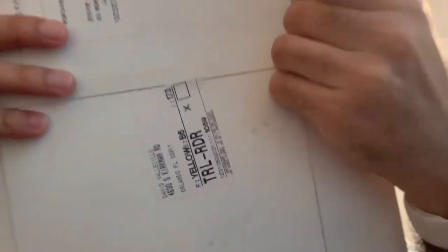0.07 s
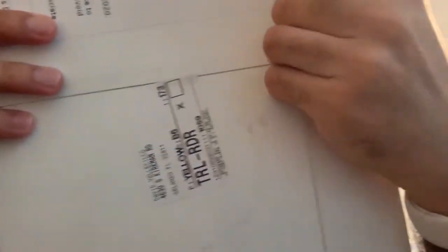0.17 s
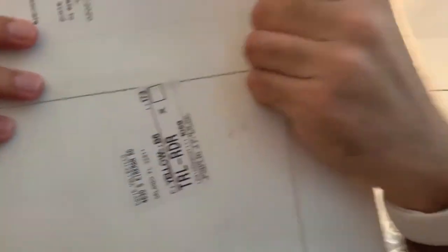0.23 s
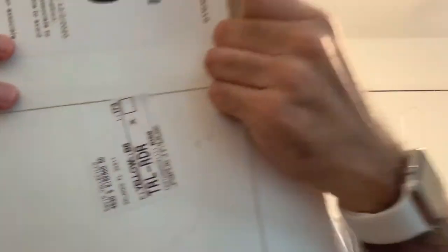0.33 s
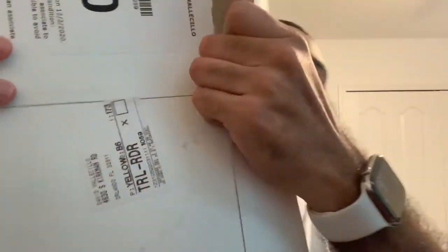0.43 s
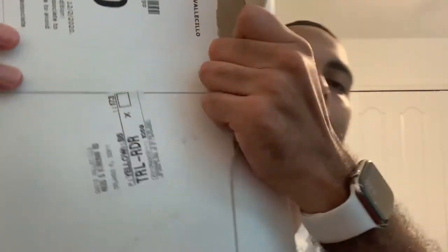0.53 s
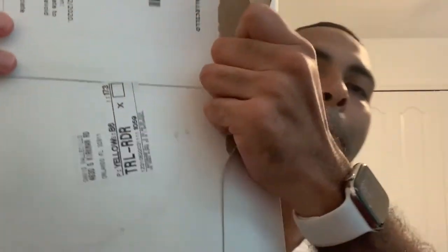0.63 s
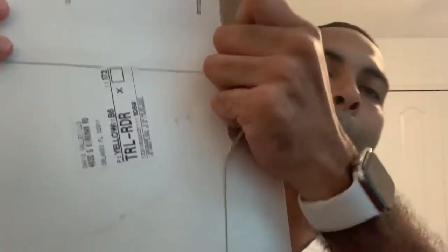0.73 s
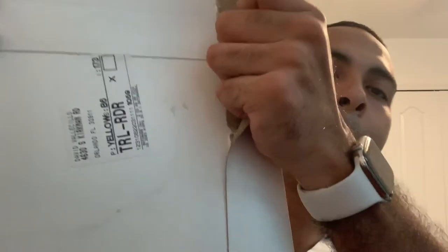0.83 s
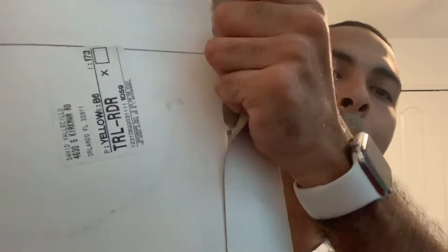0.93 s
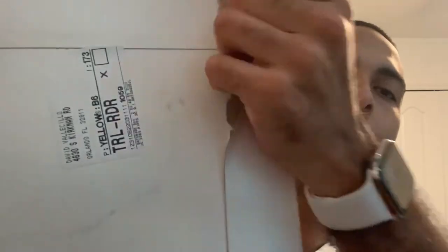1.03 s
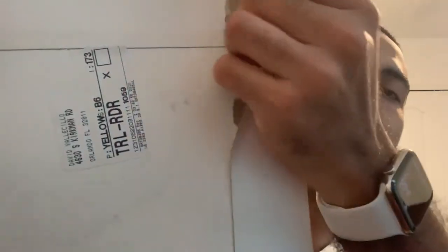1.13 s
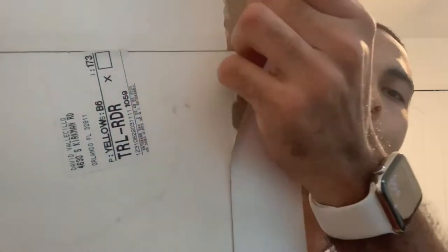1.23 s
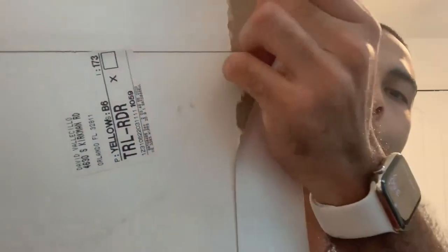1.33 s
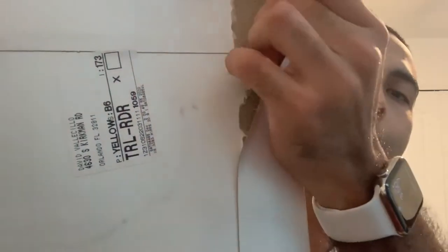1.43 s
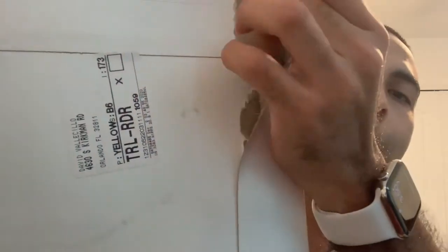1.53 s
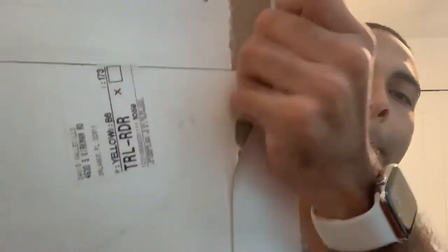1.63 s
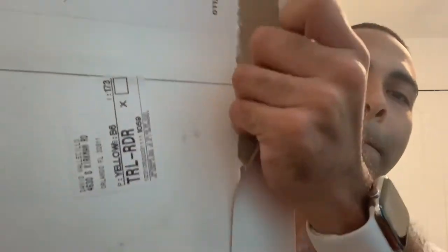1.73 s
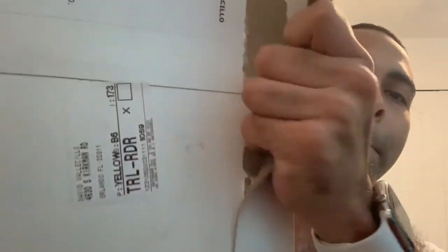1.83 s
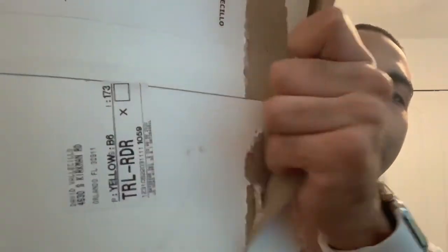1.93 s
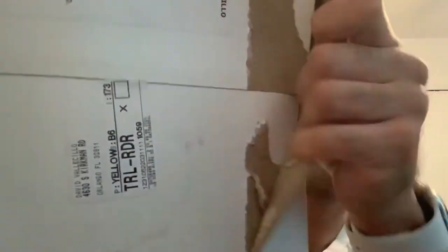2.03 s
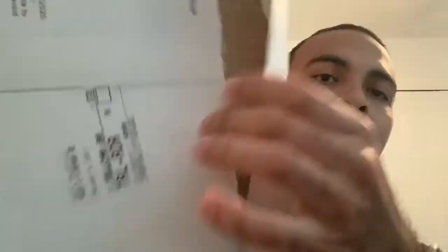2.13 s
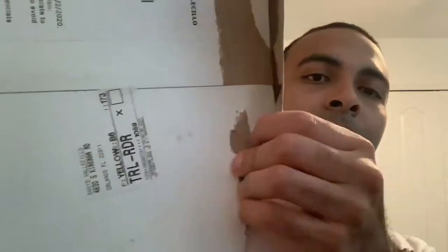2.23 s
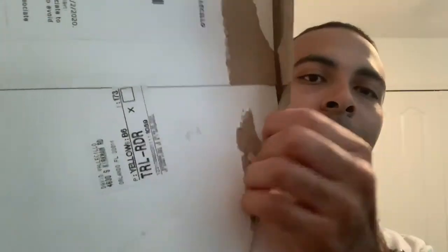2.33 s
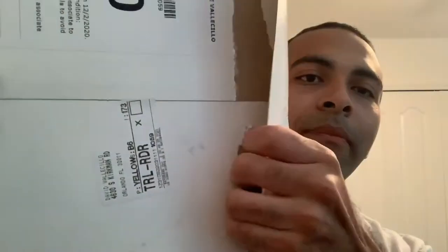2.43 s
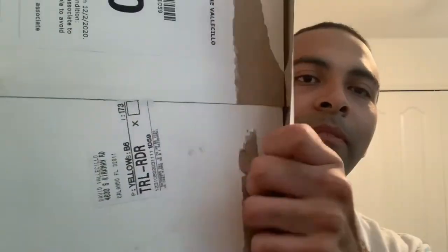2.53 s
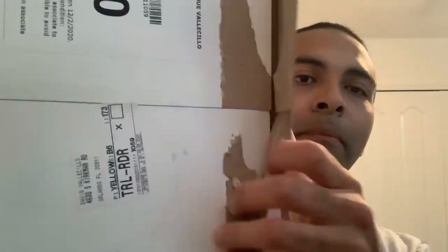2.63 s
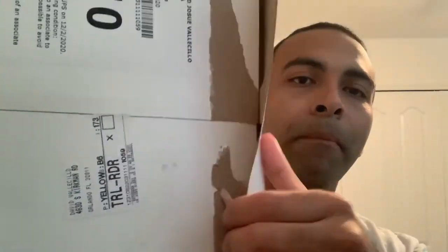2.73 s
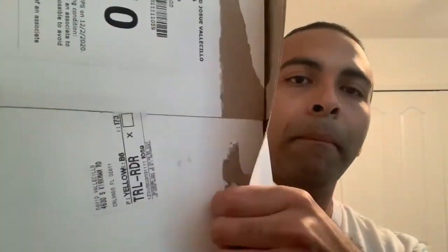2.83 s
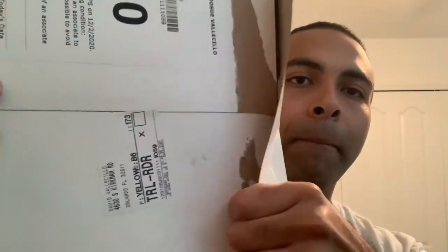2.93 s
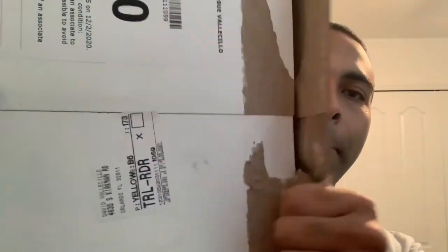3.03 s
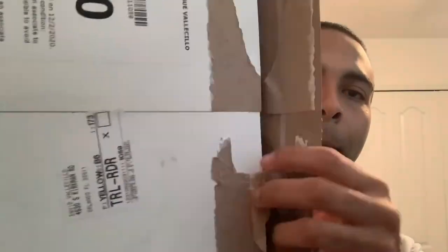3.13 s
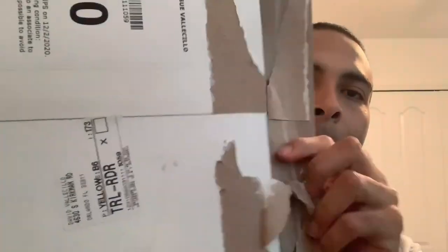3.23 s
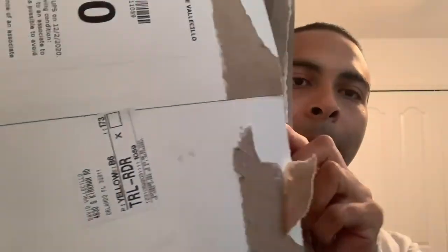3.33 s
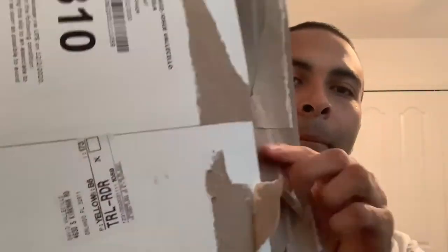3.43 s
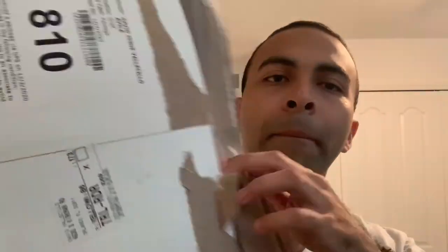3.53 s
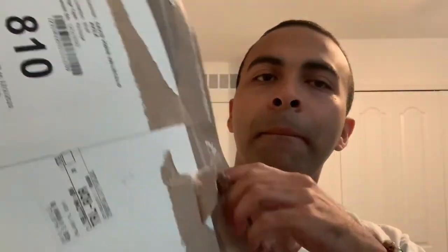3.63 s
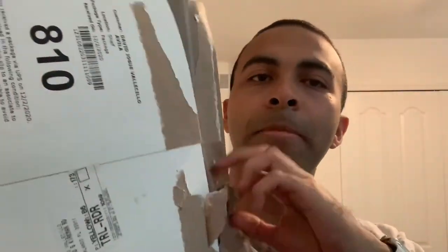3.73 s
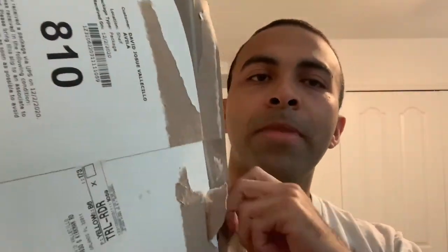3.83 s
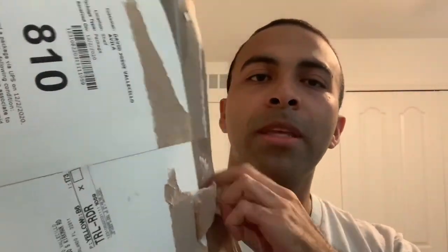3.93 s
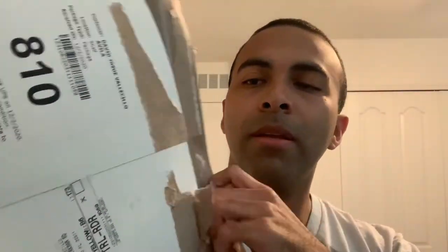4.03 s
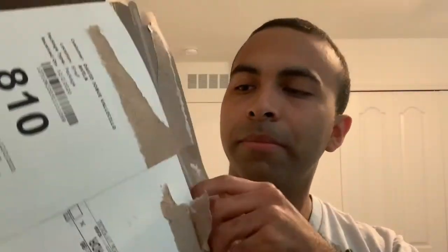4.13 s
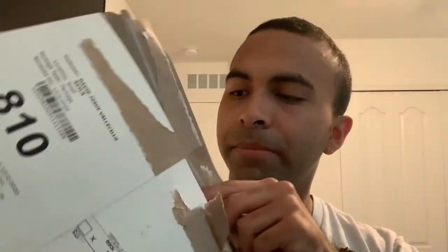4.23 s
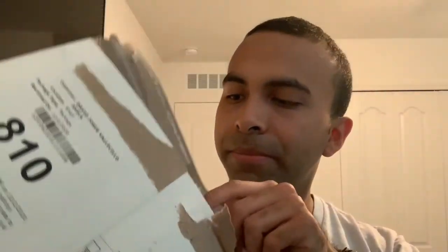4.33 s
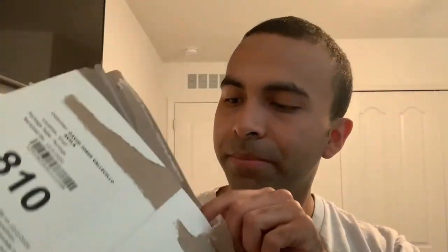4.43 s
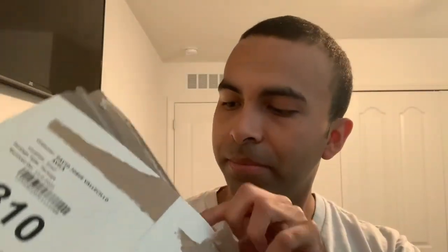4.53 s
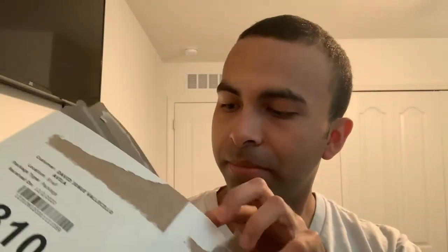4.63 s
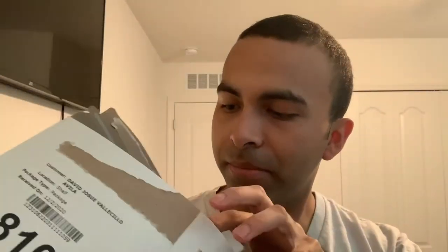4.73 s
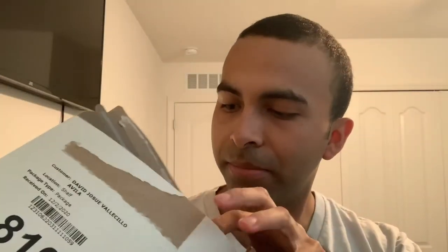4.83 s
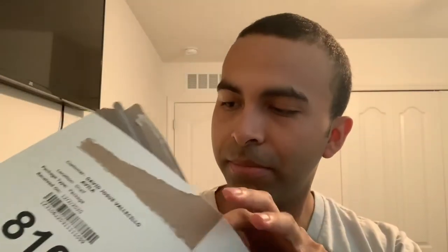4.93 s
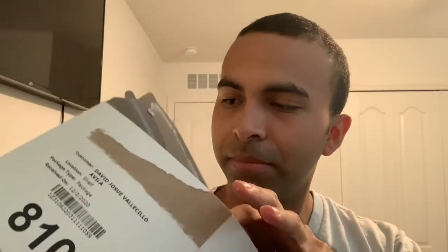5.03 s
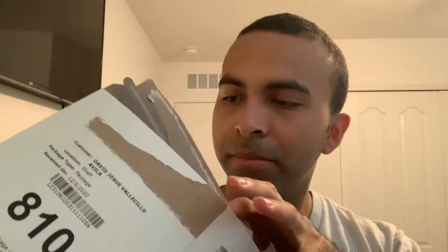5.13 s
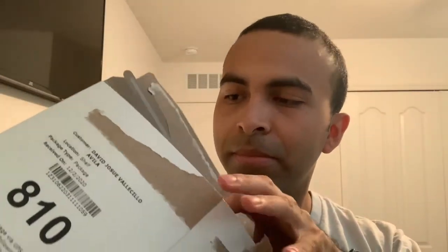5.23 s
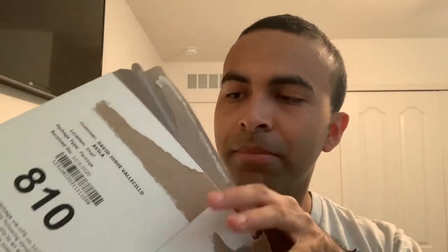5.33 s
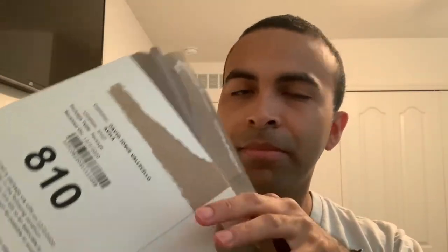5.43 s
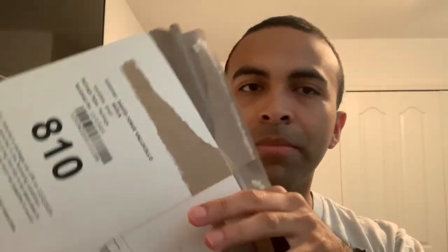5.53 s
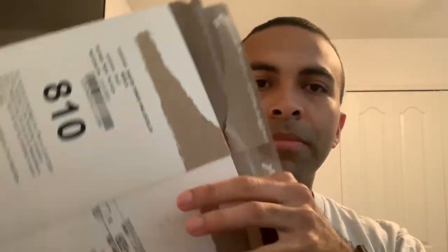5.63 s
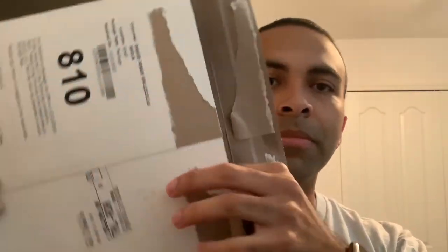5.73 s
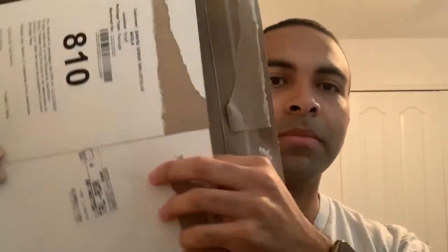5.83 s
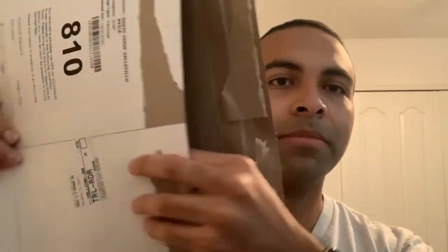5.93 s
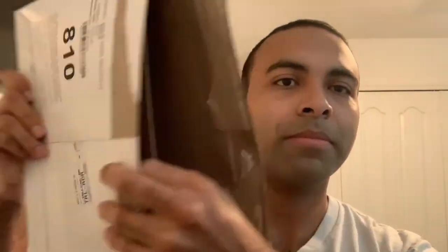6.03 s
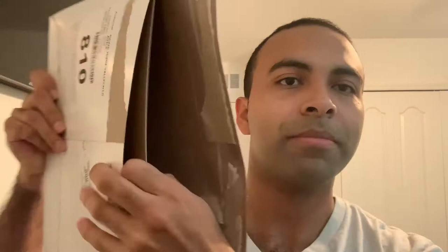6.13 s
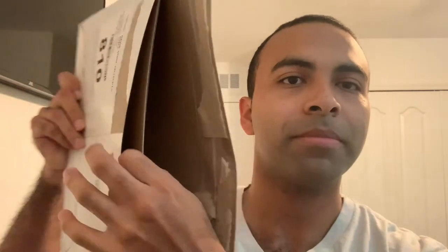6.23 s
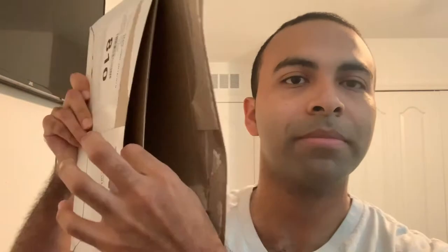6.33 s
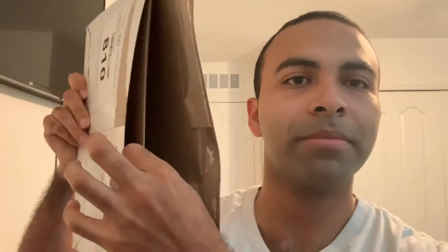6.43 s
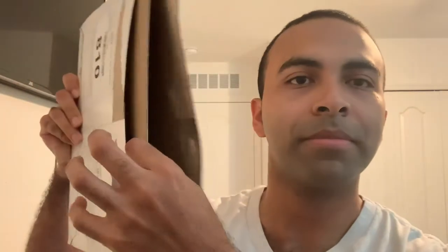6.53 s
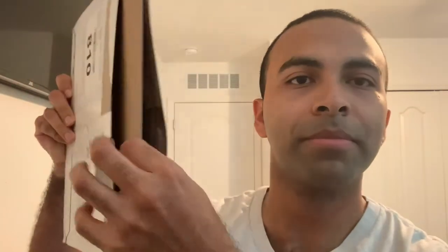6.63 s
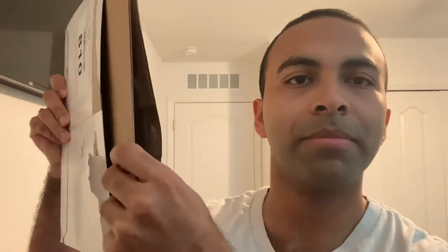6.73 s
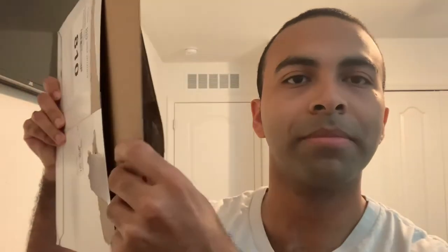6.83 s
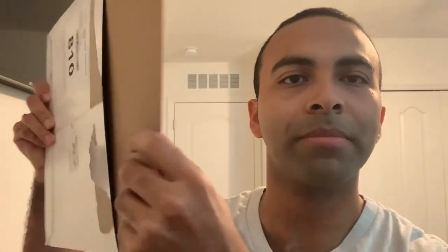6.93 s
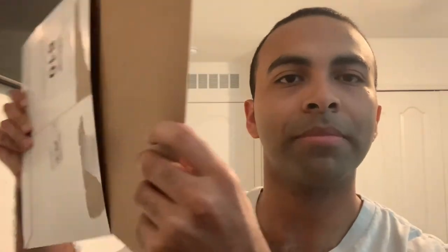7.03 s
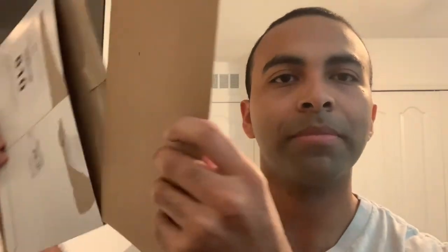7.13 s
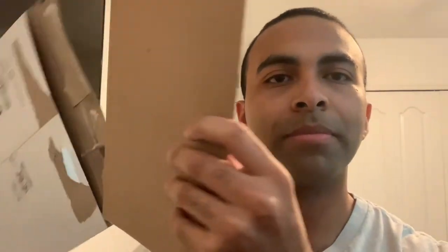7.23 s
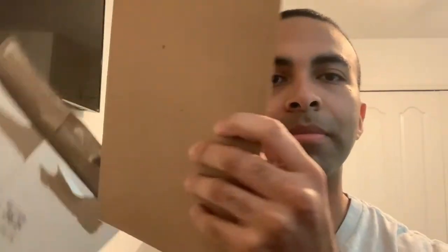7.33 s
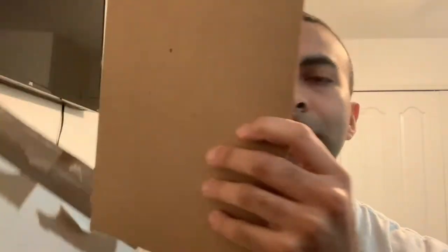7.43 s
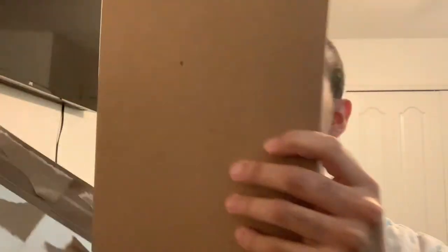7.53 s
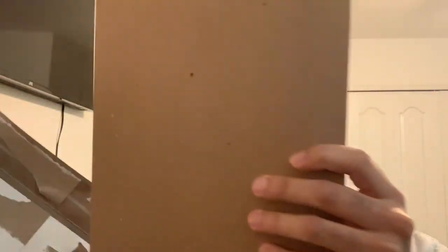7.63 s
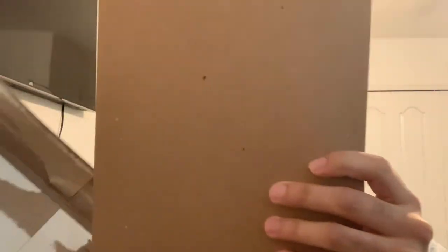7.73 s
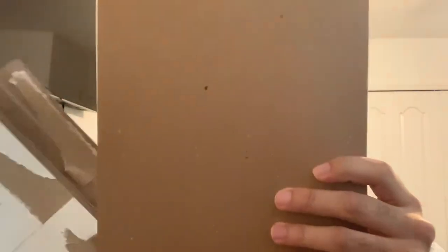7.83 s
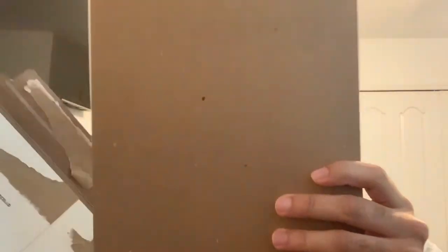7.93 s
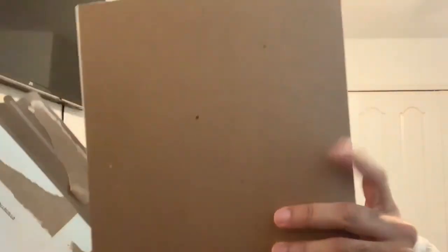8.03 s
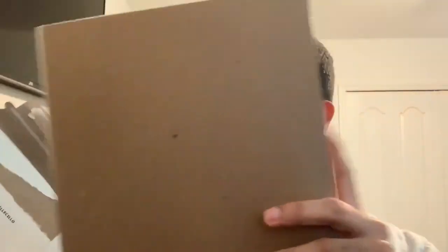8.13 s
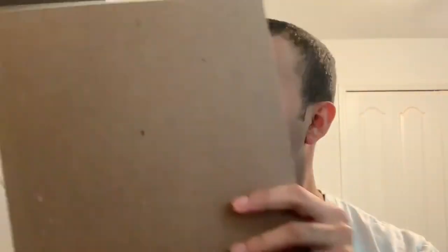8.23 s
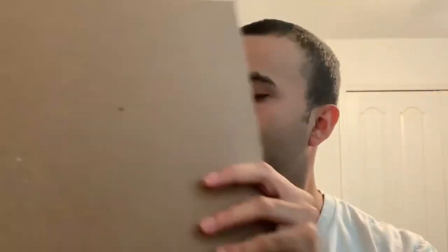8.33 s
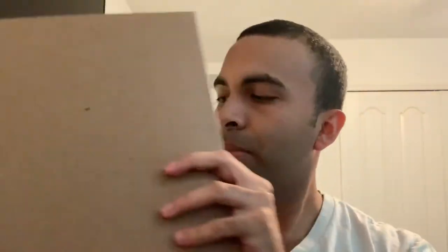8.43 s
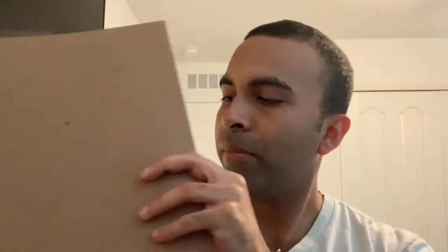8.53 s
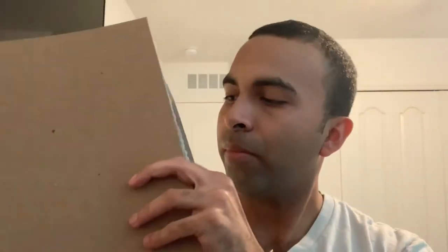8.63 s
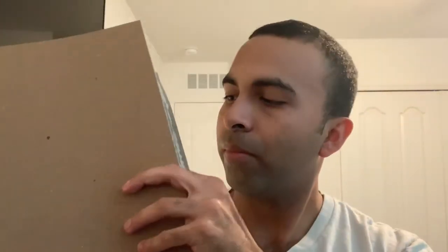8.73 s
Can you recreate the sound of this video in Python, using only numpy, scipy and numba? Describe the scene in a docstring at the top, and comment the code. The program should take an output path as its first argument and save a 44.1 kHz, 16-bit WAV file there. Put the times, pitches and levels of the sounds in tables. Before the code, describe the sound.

Hands prise open a cardboard mailer close to a phone microphone in a quiet room. The glued flap creaks and snaps, then gives way in a loud, crackling rip. Thinner crumpling and peeling follow as the flap is worked loose. The sound softens into dull handling taps and a low wobble of flexing panels, before a stiff board slides out with a dry hiss and is lightly bumped.

```python
"""Tearing open a cardboard mailer

Hands tear a mailer open close to a phone in a quiet room, then pull boards out of it. Fibres and glue
let go in snaps and dense crackle, impulses that excite the bending modes of the board. Sliding sheets
hiss by friction, and the big panels flex with a low wobble. The phone's two microphone ports
receive the treble out of phase."""
import sys
import numpy as np
from scipy import signal
from scipy.fft import rfft, irfft, next_fast_len
from scipy.io import wavfile
from scipy.ndimage import uniform_filter1d
from numba import njit

SR = 44100
rng = np.random.default_rng(int(sys.argv[2]) if len(sys.argv) > 2 else 0)


def waveform_to_disk(signal):
    """Save audio, clipped to [-1, 1], as 16-bit WAV at the path in sys.argv[1]."""
    frames = np.transpose(np.atleast_2d(signal))
    scaled = np.clip(frames, -1, 1) * 32767
    samples = np.round(scaled).astype(np.int16)
    wavfile.write(sys.argv[1], SR, samples)


N = 386933

# Levels are relative. Modes of the board and of the big panels: f/Hz, level/dB, t60/s
BOARD_MODES = [(390.2, -0.5, 0.031), (727.1, -1.5, 0.033), (1030, -5, 0.039), (1347, -5.5, 0.049),
               (1515, 1, 0.022), (1987.5, -0.5, 0.03), (2474.1, -1, 0.046), (3230.7, 7, 0.02),
               (4862, 8.5, 0.0087), (6430, 4.5, 0.01)]
PANEL_MODES = [(71.5, -0.5, 0.1), (92.3, -4.5, 0.1), (169.8, -5.5, 0.081)]
# Slow sway of the held panels: t/s, level/dB
PANEL_SWAY = [(0, -60), (1.04, -53), (1.33, -71), (2.86, -73.5), (3.2, -57.5), (4.05, -58.5), (5.43, -72),
              (7.23, -69), (8.11, -65), (8.77, -77)]
# Quick bends of the panels: peak t/s, level/dB, time to fall 20 dB/s
PANEL_BENDS = [(.5, -39, 0.08), (1.58, -38.5, 0.2034), (1.861, -38.5, 0.0773), (2.061, -39, 0.1961),
               (2.46, -50, 1.16), (2.6, -47.5, 1.12), (3.0, -49.5, 2.5), (4.351, -53, .5),
               (5.89, -54, 1.5053), (6.649, -58.5, 0.01), (8.44, -45, 0.07), (8.711, -50, 0.2)]
# Friction by kind of contact: grain scatter/dB (small in sliding, large in tearing), colour f/Hz,
# fizz level/dB, body level/dB, bluntness of the envelope (1 peaked, 2 round)
CONTACTS = {"prise": (5, 3198.5, -5, -6.5, 0.9345), "rip": (5, 1650.5, -6.5, -10.5, 1.375),
            "crumple": (6, 3599.5, -3.5, -3, 1), "peel": (4, 5500.5, -1, -8, 1.3047),
            "handle": (3.5, 800.5, -20, -0.14, 1.2171), "slide": (0.95, 2999.5, -5, -12.5, 2),
            "brush": (4, 2499, -16, -1.5, 2.5)}
# Hand movements: peak t/s, level/dB, swell/s and fade/s (each over 20 dB), kind of contact
HAND_STROKES = [(.14, -46.5, 0.25, 0.21, "prise"), (.36, -46, .17, 0.22, "prise"),
                (.48, -39, 0.099, 0.24, "prise"), (.68, -41.5, 0.096, 0.34, "prise"),
                (1.0, -48, 0.27, .19, "prise"), (1.459, -38.5, 0.04, 0.21, "rip"),
                (1.57, -38, 0.067, 0.11, "rip"), (1.76, -41.5, 0.13, 0.13, "rip"),
                (1.86, -28, 0.069, 0.12, "rip"), (1.94, -36.5, 0.041, 0.056, "rip"),
                (2.1, -45.5, 0.15, 0.1056, "crumple"), (2.22, -60, 0.2, 0.504, "crumple"),
                (2.459, -38.5, 0.11, 0.084, "crumple"), (2.76, -48, 0.19, 0.48, "peel"),
                (2.855, -42.5, 0.12, .16, "peel"), (3.09, -45.5, 0.13, 0.06, "crumple"),
                (3.23, -40.5, 0.23, 0.072, "crumple"), (3.33, -43, 0.12, 0.0677, "crumple"),
                (3.559, -47.5, 0.17, 0.133, "crumple"), (3.788, -38, 0.094, 0.055, "crumple"),
                (3.86, -52, 0.049, 0.15, "crumple"), (3.99, -54, 0.077, 0.26, "crumple"),
                (4.19, -59, .1, 0.23, "handle"), (4.33, -49.5, 0.069, 0.19, "handle"),
                (4.52, -55.5, 0.27, 0.31, "handle"), (4.712, -46.5, 0.11, 0.0713, "handle"),
                (4.8, -50.5, 0.044, 0.088, "handle"), (4.909, -52, 0.17, 0.1, "handle"),
                (5.061, -68.5, 0.22, 0.47, "handle"), (5.3, -60, 0.11, 0.16, "brush"),
                (5.5, -64.5, 0.19, .12, "brush"), (5.659, -63.5, 0.069, 0.13, "brush"),
                (5.83, -57, .1, .12, "handle"), (5.96, -46.5, 0.061, 0.045, "slide"),
                (6.029, -43.5, 0.0635, 0.056, "slide"), (6.219, -65.5, 0.473, 0.28, "slide"),
                (6.44, -45.5, 0.0958, 0.1107, "slide"), (6.56, -51.5, 0.084, 0.0887, "slide"),
                (6.86, -51, .2, 0.2615, "slide"), (7.051, -51.5, 0.22, 0.0757, "slide"),
                (7.365, -59.5, 0.083, .09, "handle"), (7.785, -65.5, 0.015, .2, "brush"),
                (7.978, -53.5, 0.07, .07, "crumple"), (8.31, -53.5, 0.06, 0.07, "slide"),
                (8.491, -57, 0.28, 0.197, "handle"), (8.748, -48, 0.069, 0.18, "handle")]
# Fractures of fibre and glue: t/s, level/dB, f/Hz of the spot, rip length/s, relative crack level/dB
FRACTURES = [(0.121, -20, 1590, 0.0266, -20.5), (0.151, -29.5, 1913, 0.063, -12),
             (0.21, -26, 1560, 0.0186, -22.5), (0.441, -25, 1270, 0.0497, -10),
             (0.471, -12.5, 1547, 0.078, -10), (0.763, -33.5, 1284, 0.034, 0),
             (0.891, -29.5, 1368, 0.034, -38.5), (0.918, -30.5, 1836, 0.0845, -12.5),
             (0.977, -22, 1742, 0.04, -16.5), (1.432, -7, 422.4, 0.026, -18.5),
             (1.479, -29, 702, 0.178, -39.5), (1.53, -20, 1532, 0.076, -35.5),
             (1.553, -19.5, 1700, 0.029, -37.5), (1.585, -20, 1603, 0.0636, -28),
             (1.719, -25.5, 1753, 0.037, -19.5), (1.829, -15.5, 3580, 0.0243, -9),
             (1.838, -14, 1890, 0.0203, -19.5), (1.853, -19.5, 1346, 0.031, -22),
             (1.871, -12.5, 3145, 0.05, -10), (1.887, -18, 1713, 0.03, -17.5),
             (1.927, -27, 1693, 0.034, -9), (1.951, -27.5, 2008, 0.02, -10.5),
             (1.958, -23, 1744, 0.02, -9.5), (2.032, -33, 295, 0.0645, -31.5),
             (2.09, -18.5, 897, 0.0176, -13), (2.207, -40, 349, 0.0315, -16),
             (2.443, -16.5, 3104, 0.035, -9.5), (2.449, -15, 3361, 0.0714, -14),
             (2.574, -30.5, 955, 0.07, -12.5), (2.726, -34.5, 1830, 0.072, -5.5),
             (2.951, -19, 2846, 0.059, -13), (2.961, -24, 3423, 0.083, -11),
             (3.105, -27.5, 2620, 0.024, -28.5), (3.168, -27, 870.7, 0.039, -4),
             (3.219, -26.5, 1103, 0.059, -13), (3.303, -39, 5500, 0.0184, -10.5),
             (3.411, -33, 863, 0.068, -4.5), (3.479, -30.5, 863.5, 0.0705, -16),
             (3.505, -25, 371, 0.0307, -25.5), (3.572, -32.5, 1000, 0.0366, -14.5),
             (3.675, -34, 336.4, 0.0196, -22.5), (3.713, -36.5, 1372, 0.049, -35),
             (3.899, -40, 934, 0.085, -18.5), (3.973, -34.5, 1350, 0.088, -25),
             (4.093, -32, 824, 0.0178, -28), (4.319, -27, 1279, 0.0443, -6.5),
             (4.593, -34.5, 776, 0.0376, -48), (4.655, -31, 734, 0.0433, -43.5),
             (4.692, -30, 713, 0.0484, -44), (5.731, -44, 910, 0.043, -22.5),
             (5.874, -34, 1150, 0.017, -14), (6.647, -37, 1552, 0.0517, -43.5),
             (6.852, -35, 1340, 0.055, -30), (7.747, -55, 650, 0.02, -31.5),
             (7.875, -48.5, 2300, 0.03, -20), (8.085, -50.5, 494, 0.02, -31),
             (8.411, -34.5, 968, 0.0243, -28.5), (8.689, -29.5, 373, 0.0466, -36)]
# Right port against left: f/Hz, phase/rad, switched phase/rad, coherence, switched coherence, level/dB
PORT_RESPONSE = [(0, -.3, 0, .93, .93, -4.5), (1000, -1.4, -.9, .65, .7, -3),
                 (3000, -2.7, -1.3, .45, .72, -2.5), (5500, -4.8, -2.6, .5, .8, -1.5),
                 (8300, -3.14, -2.8, 1, .6, 0), (12500, 0, -4.7, 1, .7, 0), (16500, 3.3, -3.4, .8, .8, 0)]

AIR_DB, HUM_HZ, HUM_DB = -84, 178, -81
SQUEAK_S, SQUEAK_DB, SQUEAK_HZ, SQUEAK_FADE_S = 8.165, -76, 4480, .2
BEND_SWELL_S = 0.11
CREAK_PER_S, CREAK_HZ, CREAK_DB, CREAK_END_S = 103, 1370, -2, 1.2  # level relative to the rubbing
# Between these times the phone mixes its ports another way: less bass, more presence.
SWITCH_S, DIP_S, SWITCHED_CUT_HZ, PRESENCE_BAND_DB = (1.985, 4.115), 0.032, 113.4, 6
HOLLOW_HZ, HOLLOW_WIDTH_HZ, TOP_HZ = 555.2, 88, 15800


def undb(db):
    """Amplitude ratio of a level in decibels."""
    return 10 ** (np.asarray(db) / 20)


def unit(x):
    """Normalisation to an rms of 1."""
    return x / np.sqrt(np.mean(x ** 2))


def fade(t, t60):
    """Exponential damping: 60 dB in t60."""
    return np.exp(-np.log(1000) * t / t60)


def band(x, lo_hz, hi_hz, order=2):
    """Butterworth band-pass filtering."""
    return signal.sosfilt(signal.butter(order, [lo_hz, hi_hz], "band", fs=SR, output="sos"), x)


@njit
def resonator(x, hz, q):
    """Second-order resonance: a band-pass whose centre may move every sample."""
    y = np.empty(len(x))
    band_state, low_state, damping = 0., 0., 1 / q
    for i in range(len(x)):
        g = np.tan(np.pi * hz[i] / SR)
        v = (band_state + g * (x[i] - low_state)) / (1 + g * (g + damping))
        band_state, low_state = 2 * v - band_state, low_state + 2 * g * v
        y[i] = damping * v
    return y


def wander(per_s):
    """Random modulation: straight ramps between Gaussian values, rms 1."""
    hold = int(SR / per_s)
    steps = np.repeat(rng.standard_normal(N // hold + 1), hold)
    return unit(uniform_filter1d(steps, hold)[:N])


def hump(t, peak_s, db, swell_s, fade_s, bluntness):
    """Power envelope of one movement, 20 dB down at swell_s before and fade_s after its peak."""
    distance = np.where(t < peak_s, (peak_s - t) / swell_s, (t - peak_s) / fade_s)
    return undb(2 * (db - 20 * distance ** bluntness)) + 1e-14


def ring(modes, weight_db, t, dispersion):
    """Modal superposition with dispersion: low bending waves travel slower and arrive late."""
    hz, db, t60 = np.transpose(modes)[:, :, None]
    delay_s = dispersion * (1 / np.sqrt(hz) - 1 / np.sqrt(hz.max()))
    age = np.maximum(t - delay_s, 0)
    return np.sum(undb(db + weight_db) * np.sin(2 * np.pi * hz * age) * fade(age, t60), axis=0)


def slips(size, per_s, scatter_db, t60):
    """Shot noise: random log-normal releases with short tails gate two noises; mean power near 1."""
    hit = rng.random(size) < per_s / SR
    bias_db = scatter_db ** 2 * np.log(10) / 10
    power = hit * undb(2 * (scatter_db * rng.standard_normal(size) - bias_db)) * SR / per_s
    pole = fade(2 / SR, t60)
    return np.sqrt(signal.lfilter([1 - pole], [1, -pole], power)) * rng.standard_normal((2, size))


def room():
    """Ambient noise: broadband air, and a faint hum that wavers as any narrow noise band does."""
    air, hum = rng.standard_normal((2, 2, N))
    air = unit(band(air, 60, 3200, order=1))
    hum = unit(band(hum, HUM_HZ - 8, HUM_HZ + 8))
    return undb(AIR_DB) * air + undb(HUM_DB) * hum


def squeak():
    """Friction of skin on board: a narrow resonance gives a faint, broken chirp that sags in pitch."""
    now = np.arange(N) / SR
    hz = SQUEAK_HZ * (1 + .012 * wander(40) - .2 * np.clip(now - SQUEAK_S, -1, 1))
    noise = rng.standard_normal((2, N))
    tone = unit(np.array([resonator(resonator(x, hz, q=16.), hz, q=16.) for x in noise]))
    envelope = np.sqrt(hump(now, SQUEAK_S, SQUEAK_DB, SQUEAK_FADE_S, SQUEAK_FADE_S, bluntness=1))
    return undb(4 * wander(45)) * tone * envelope


def bending_db(t):
    """Flexure level of the panels: slow sway and quick bends add in power."""
    sway = undb(2 * np.interp(t, *np.transpose(PANEL_SWAY)))
    bends = sum(hump(t, s, db, BEND_SWELL_S, fade_s, bluntness=0.948) for s, db, fade_s in PANEL_BENDS)
    return 10 * np.log10(sway + bends)


def hands(now):
    """Power summation of the strokes: total level, then power-weighted scatter, colour, fizz and body."""
    t = np.arange(0, N / SR, .002)
    power = np.array([hump(t, *stroke, CONTACTS[kind][4]) for *stroke, kind in HAND_STROKES])
    total = power.sum(axis=0)
    contact = np.array([CONTACTS[kind][:4] for *_, kind in HAND_STROKES]).T @ (power / total)
    return [np.interp(now, t, curve) for curve in (10 * np.log10(total), *contact)]


def creak():
    """Relaxation oscillation: the prised glue line slips almost regularly, and each slip rings the flap."""
    cycles = np.cumsum(CREAK_PER_S * 2 ** (.45 * wander(30)) / SR)
    ticks = np.diff(np.floor(cycles), prepend=0) * undb(4.5 * rng.standard_normal(N))
    puffs = 0.21 * np.exp(-(cycles % 1) / 0.32) * rng.standard_normal((2, N))
    flap = band(ticks + puffs, CREAK_HZ / 1.2, CREAK_HZ * 1.2)
    return unit(flap) * (np.arange(N) < CREAK_END_S * SR)


def rubbing():
    """Stick-slip friction: dense releases, bunched in tearing, fizz and drive the board and panels."""
    now, t = np.arange(N) / SR, np.arange(SR // 8) / SR
    rub_db, scatter_db, colour_hz, fizz_db, body_db = hands(now)
    flex_db = np.interp(now, now[::64], bending_db(now[::64]))
    bunch_db = 0.55 * scatter_db * (wander(45) + wander(130)) - 0.12 * scatter_db ** 2
    grain = undb(bunch_db) * slips(N, per_s=2500., scatter_db=0.38 * np.clip(scatter_db, 0, 10), t60=0.008)
    board_response = ring(BOARD_MODES, 0, t[:SR // 25], dispersion=0.02988)
    board = unit(signal.oaconvolve(grain, board_response[None], axes=1)[:, :N])
    hiss = unit(band(grain, 820, 5400, order=3))
    # The spot being rubbed shifts, so its colour wanders.
    spot_hz = colour_hz * 2 ** (0.26 * wander(15))
    rub = np.array([resonator(x, colour_hz, q=0.39) + 0.6 * resonator(x, spot_hz, q=3.6) for x in hiss])
    rub += 0.24 * unit(band(board, 900, 3000))
    # The panels follow the hands' push, partly in step with the slips.
    push = grain + 3.1 * undb(6.4 * wander(9.2)) * rng.standard_normal((2, N))
    panel_response = ring(PANEL_MODES, 0, t, dispersion=0.038)
    flex = signal.oaconvolve(push, panel_response[None], axes=1)[:, :N]
    layers = [(unit(rub) + undb(CREAK_DB) * creak(), rub_db),
              (band(grain, 4300, 19000), rub_db + fizz_db),
              (band(board, 150, 1000), rub_db + body_db),
              (flex, flex_db)]
    return sum(undb(db) * unit(x) for x, db in layers)


def gripped_modes(spot_hz, rip_s):
    """Boundary conditions: each grip detunes the board's modes, and the fingers damp the high ones."""
    modes = np.array(BOARD_MODES)
    nearest = np.argmin(np.abs(np.log(modes[:, 0] / spot_hz)))
    modes[:, 0] *= 2 ** (rng.standard_normal(len(modes)) / 10)
    modes[nearest, 0] = spot_hz
    modes[nearest, 2] = 0.015 + 0.24 * rip_s
    modes[:, 2] *= np.minimum(500 / modes[:, 0], 1) ** 0.62
    return modes


def snaps(after_db=-15.5, thump_db=9):
    """Impulse excitation: a fracture and a fading run of smaller ones ring modes near the spot's pitch."""
    body, crack, kicks = np.zeros((3, 2, N + SR))
    t = np.arange(SR // 8) / SR
    for onset_s, db, spot_hz, rip_s, crack_db in FRACTURES:
        start = int(onset_s * SR)
        span = slice(start, start + len(t))
        force = undb(after_db) * slips(len(t), per_s=700., scatter_db=3.2, t60=0.006) * fade(t, rip_s)
        force[:, 0] = 1  # the first sharp release
        modes = gripped_modes(spot_hz, rip_s)
        octaves_off = np.abs(np.log2(modes[:, :1] / spot_hz))
        for path in range(2):
            weight_db = 2.5 * rng.standard_normal(octaves_off.shape) - np.minimum(13 * octaves_off, 24)
            response = ring(modes, weight_db, t[:SR // 25], dispersion=0.05)
            ringing = signal.fftconvolve(force[path], response)[:len(t)]
            body[path, span] += undb(db) * ringing / np.abs(ringing).max()
        crack[:, span] += undb(db + crack_db + 22) * force
        # The harder the panels are bent just then, the bigger their thump.
        kicks[:, start] += undb(bending_db(onset_s + 0.025) + thump_db)
    thump = signal.oaconvolve(kicks, ring(PANEL_MODES, 0, t, dispersion=0.095)[None], axes=1)
    snap = band(body, 310, 18000) + band(crack, 4500, 22000) + undb(-5) * band(crack, 1500, 4000)
    return snap[:, :N] + thump[:, :N]


def ports(paths):
    """Partial coherence: left hears the first path; right hears it phase-shifted, mixed with the second."""
    now, size = np.arange(N) / SR, next_fast_len(N + 4096)
    hz, *columns = np.transpose(PORT_RESPONSE)
    bin_hz = np.arange(size // 2 + 1) * SR / size
    phase, thin_phase, coherence, thin_coherence, db = (np.interp(bin_hz, hz, c) for c in columns)
    on, off = SWITCH_S
    switched = (now > on) & (now < off)
    dip = np.clip(np.minimum(abs(now - on), abs(now - off)) / DIP_S, .1, 1)  # at each switch
    full = paths * dip * ~switched
    thin = band(paths * dip * switched, SWITCHED_CUT_HZ, 20000, order=3)
    thin += undb(PRESENCE_BAND_DB) * band(thin, 5156, 6978, order=1)
    right = 0
    for part, shift, shared in ((full, phase, coherence), (thin, thin_phase, thin_coherence)):
        shared = np.clip(shared, 0, 1)
        first, second = rfft(part, size)
        right += undb(db) * (shared * np.exp(1j * shift) * first + np.sqrt(1 - shared ** 2) * second)
    return np.array([full[0] + thin[0], irfft(right, size)[:N]])


def scene():
    """Superposition at the ports: snaps, rubbing and a squeak over the quiet room."""
    return undb(4) * ports(snaps() + rubbing() + squeak() + room())


def record(dry):
    """Destructive interference: a near reflection cancels one band; the phone trims deep bass and top."""
    notch = signal.iirnotch(HOLLOW_HZ, HOLLOW_HZ / HOLLOW_WIDTH_HZ, SR)
    hollow = signal.lfilter(*notch, dry)
    low_pass = signal.ellip(10, .2, 70, TOP_HZ, fs=SR, output="sos")
    return signal.sosfilt(low_pass, band(hollow, 54, 14000))


dry = scene()
out = record(dry)
waveform_to_disk(out)
```